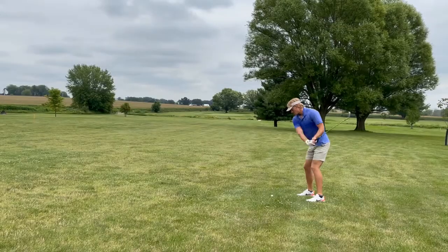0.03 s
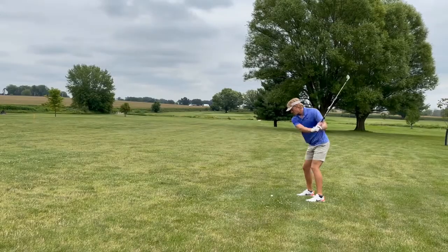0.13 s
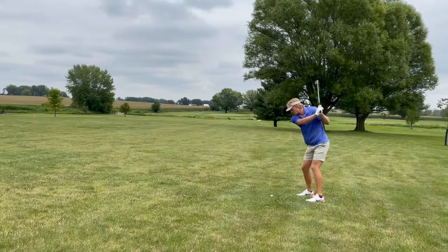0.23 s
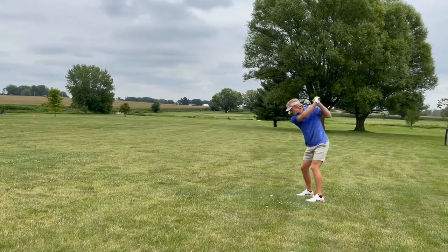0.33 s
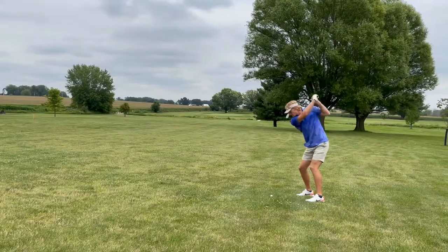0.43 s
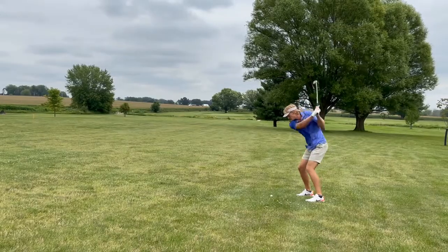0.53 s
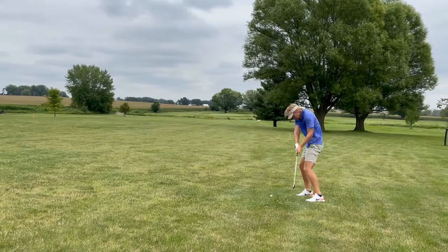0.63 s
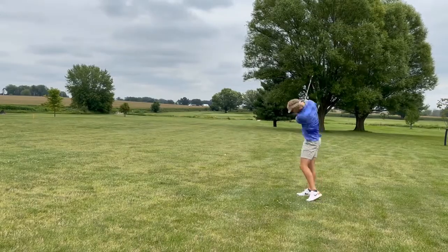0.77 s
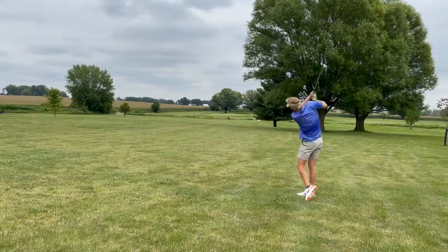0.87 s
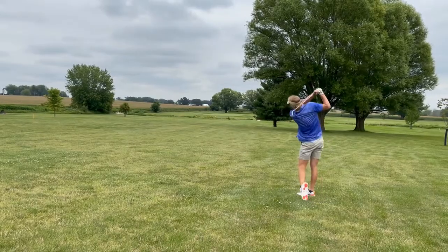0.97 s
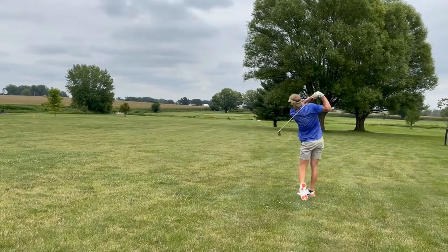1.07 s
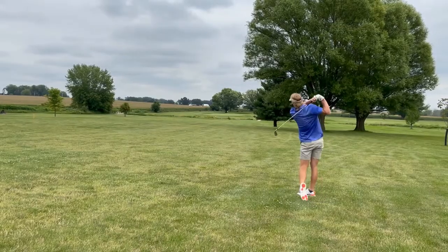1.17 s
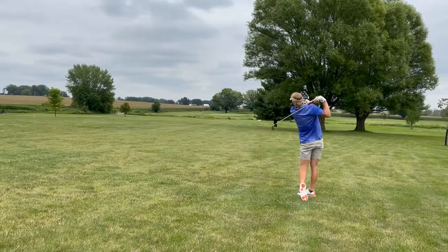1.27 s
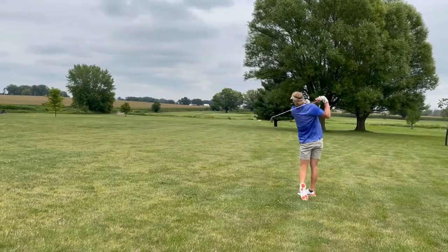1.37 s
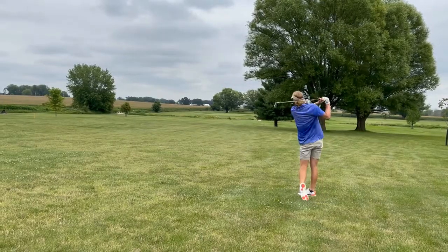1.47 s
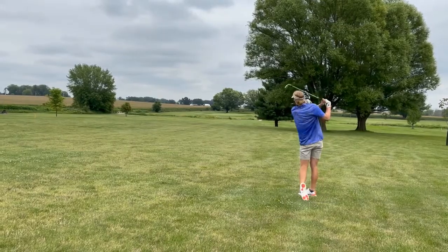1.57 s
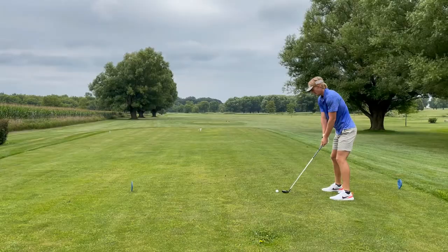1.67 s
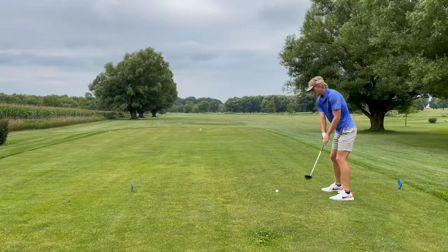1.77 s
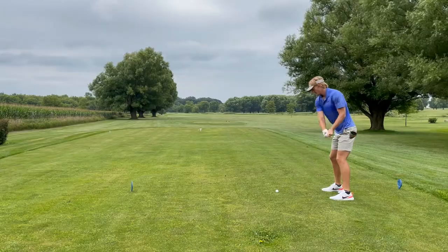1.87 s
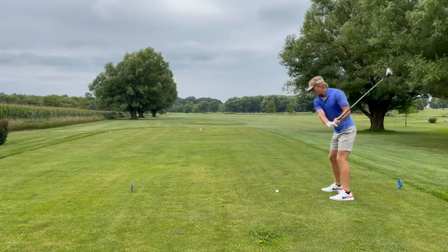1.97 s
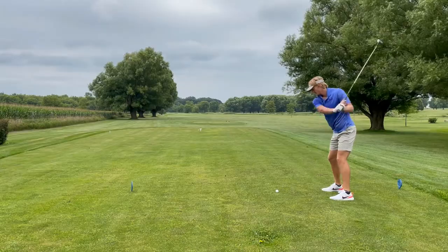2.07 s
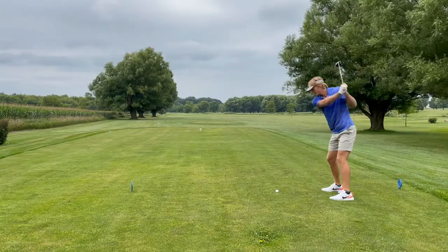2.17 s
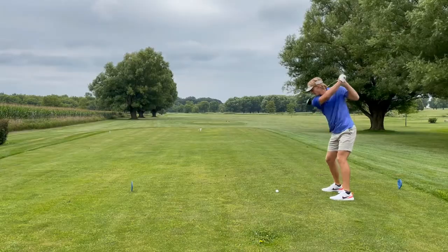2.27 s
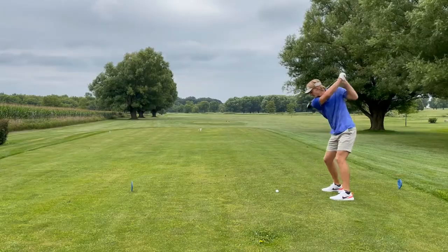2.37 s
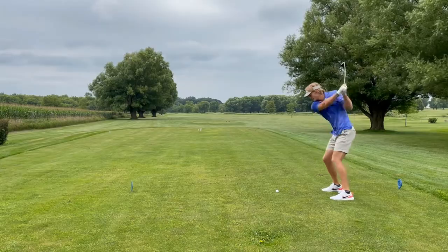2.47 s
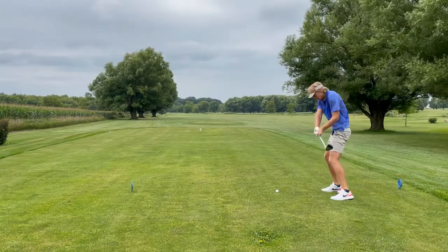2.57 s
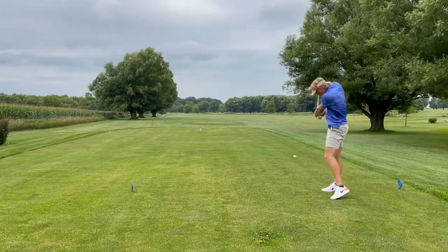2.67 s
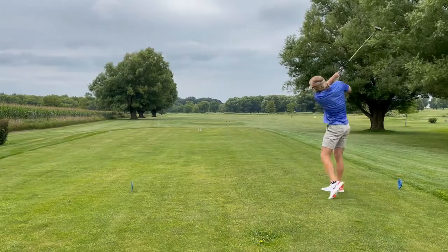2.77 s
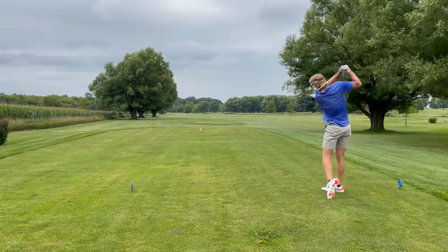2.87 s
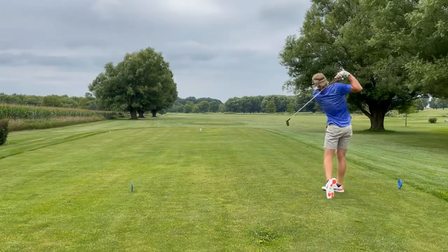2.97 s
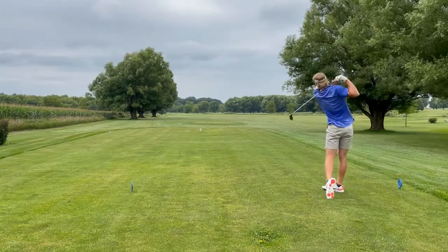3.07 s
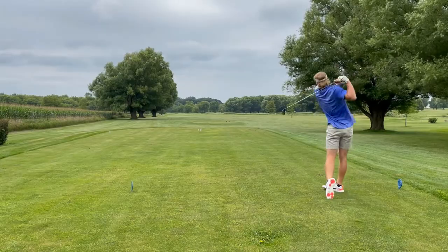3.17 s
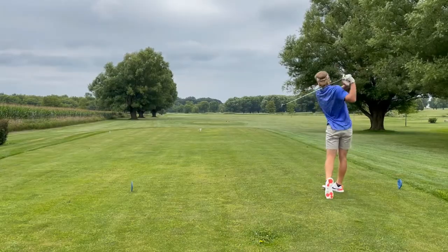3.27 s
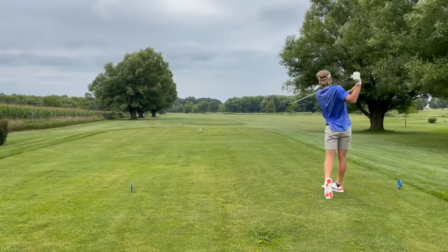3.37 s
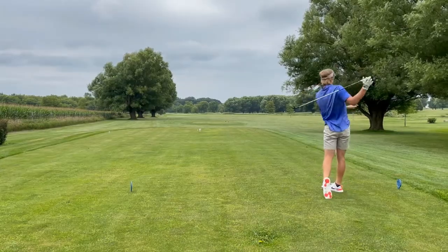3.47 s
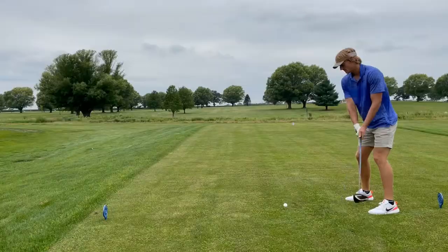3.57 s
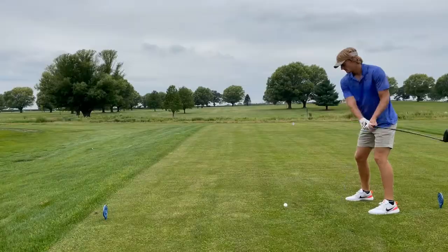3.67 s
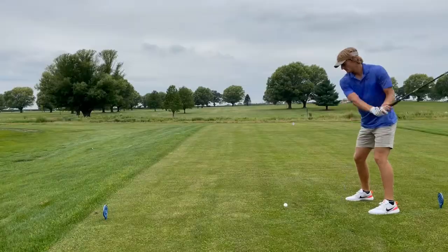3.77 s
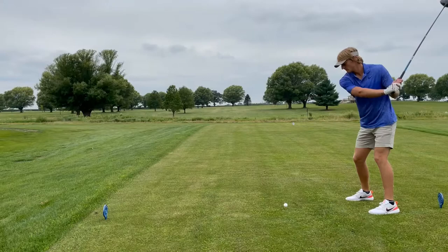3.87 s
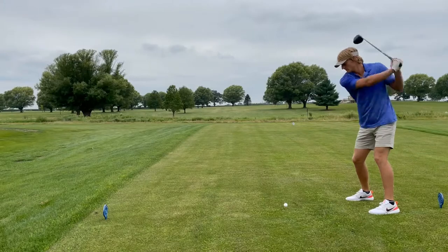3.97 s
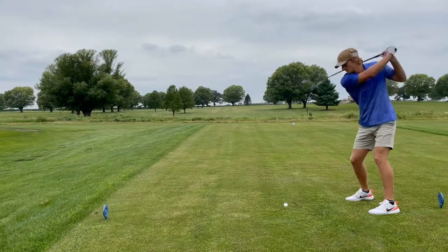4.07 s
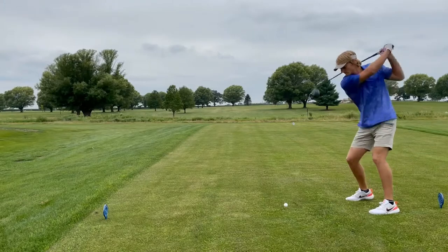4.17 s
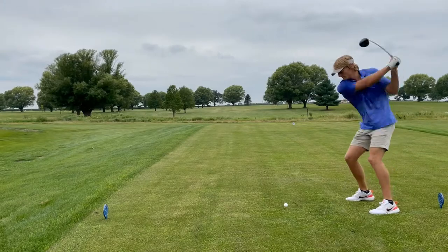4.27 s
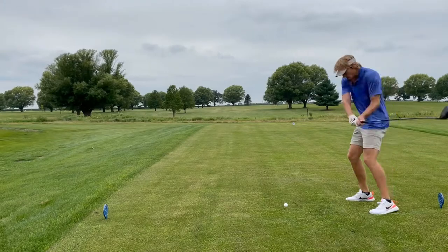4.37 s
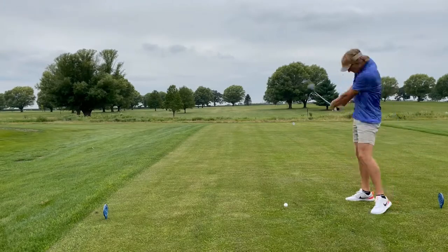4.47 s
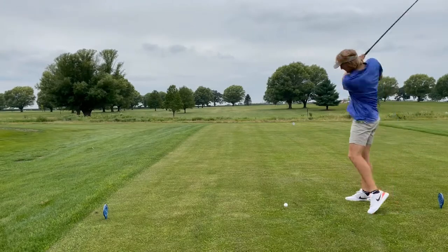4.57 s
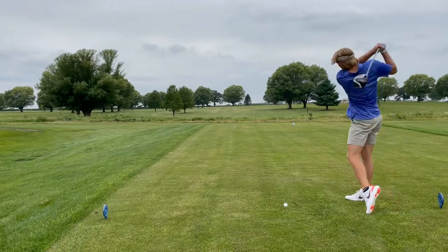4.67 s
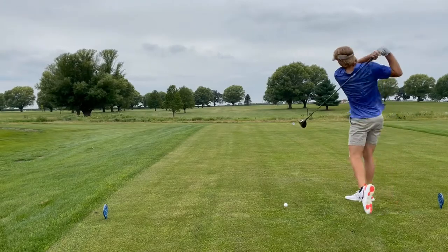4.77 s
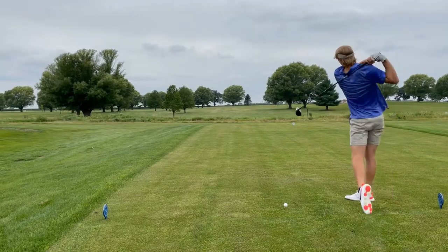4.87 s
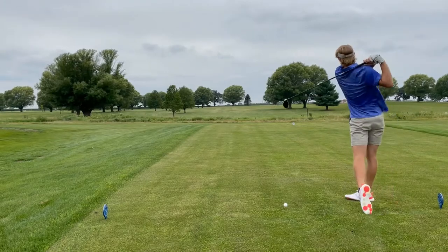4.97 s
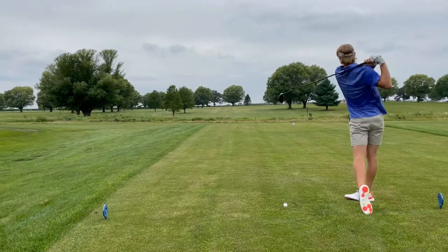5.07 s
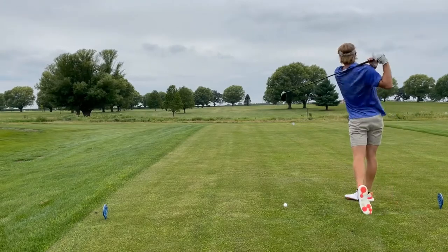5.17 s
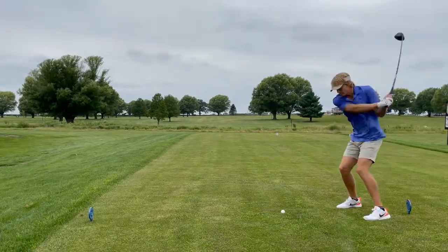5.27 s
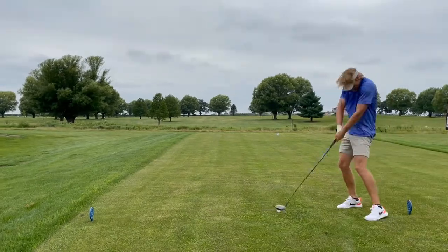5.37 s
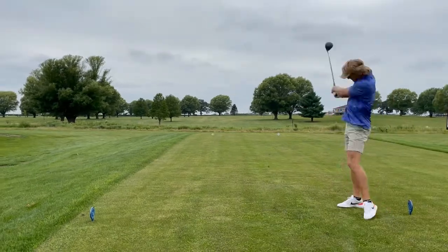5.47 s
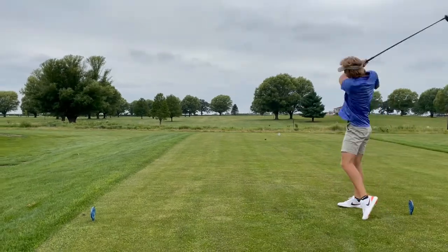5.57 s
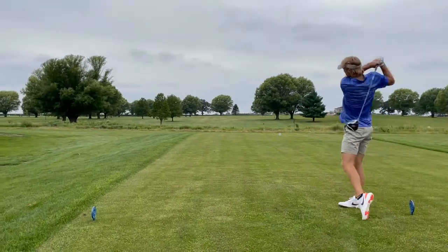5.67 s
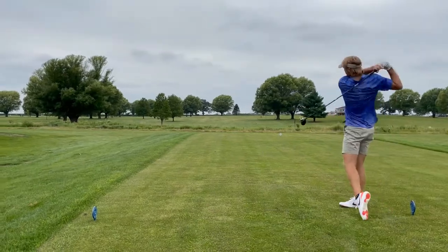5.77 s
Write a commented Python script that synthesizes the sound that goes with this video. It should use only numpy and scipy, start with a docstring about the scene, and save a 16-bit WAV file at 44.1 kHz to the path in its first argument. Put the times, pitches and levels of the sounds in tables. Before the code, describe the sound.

Whistling golf swings and hard, dry ball strikes follow one another outdoors over low rumble, far traffic and faint birdsong, with one practice swing between.

```python
"""Heard first: the low rumble and far traffic of an open golf course, with thin, distant bird tones above it.
Four scenes follow, an iron shot, a wood shot, a practice swing and a drive, each cut masked by a fade.
The shaft whistles by shedding eddies and the head hisses; band-shaped noise follows the club speed.
Each blow is a minimum-phase click, a brief ball tone, near echoes and the decaying modes of a hollow head.
Short noise puffs rustle, tick and swish; birds are gliding sines. A phone listens with two ports."""
import sys
import numpy as np
from scipy import signal
from scipy.fft import rfft, irfft, next_fast_len
from scipy.io import wavfile
from scipy.ndimage import uniform_filter1d, map_coordinates

SR = 44100
rng = np.random.default_rng(int(sys.argv[2]) if len(sys.argv) > 2 else 0)


def master_out(mix):
    """Clip the mix to full scale and print it as 16-bit PCM to the path in sys.argv[1]."""
    frames = np.transpose(np.atleast_2d(mix))
    ceiling = np.clip(frames, -1, 1)
    pcm = np.round(ceiling * 32767).astype(np.int16)
    wavfile.write(sys.argv[1], SR, pcm)


N = 256265
TIME = np.arange(N) / SR

# Scenes: start t/s, end t/s
SCENE_SPANS = [(0, 1.732), (1.732, 3.6), (3.6, 5.265), (5.265, 6)]
# Background spectrum, one list a scene: f/Hz, relative density level/dB
FIELD_SPECTRA = [
    [(25, -9), (50, -5.5), (90, 2.5), (160, -3), (300, -9), (500, -13.5), (900, -29), (1600, -34.5),
     (3000, -43), (5500, -45.5), (8500, -50), (12500, -49.5), (15500, -52.5)],
    [(25, -22), (50, 4), (90, -7.5), (160, -5), (300, -14), (500, -19.5), (900, -27.5), (1600, -31.5),
     (3000, -42), (5500, -48), (8500, -54), (12500, -47.5), (15500, -44)],
    [(25, -25), (50, 6.5), (90, 6), (160, -14.5), (300, -27.5), (500, -31.5), (900, -35.5), (1600, -40.5),
     (3000, -49.5), (5500, -56), (8500, -58), (12500, -55), (15500, -56)],
    [(25, -7.5), (50, 14), (90, 14.5), (160, -8.5), (300, -8.5), (500, -5), (900, -1.5), (1600, -11),
     (3000, -24.5), (5500, -22), (8500, -38.5), (12500, -33.5), (15500, -43.5)],
]
# Background course, one list a scene: t/s, rumble level/dB, traffic level/dB, leaf hiss level/dB
FIELD_LEVELS = [
    [(0, -53.5, -65.5, -84.5), (.6, -54, -54, -84.5), (.85, -55.5, -62.5, -77.5),
     (1.73, -53.5, -61.5, -81.5)],
    [(1.73, -56.5, -67.5, -79), (2.5, -59.5, -69.5, -75.5), (3.6, -57, -67.5, -75.5)],
    [(3.6, -56.5, -79.5, -84.5), (5.27, -58, -78.5, -80.5)],
    [(5.27, -61, -82, -81.5), (5.5, -61, -75.5, -72), (5.81, -59, -70.5, -71)],
]
# Left-right correlation of the field: f/Hz, correlation/1
FIELD_CORRELATION = [(60, .86), (300, .7), (700, .2), (3000, 0.2), (8000, 0.2), (15000, 1)]

# First bird: start t/s, length/s, initial f/Hz, level/dB reached at the end of the rise
BIRD_WHISTLES = [(0, 0.18, 4210, -61), (0.307, .2, 4143, -66.5), (0.608, .09, 4030, -65.5),
                 (0.996, 0.067, 4000, -75), (1.14, 0.06, 4070, -78), (1.278, 0.042, 4040, -81),
                 (1.41, 0.036, 4010, -69.5), (1.527, 0.045, 3990, -72.5)]
WHISTLE_RISE_S, SAG_HZ, SAG_S, FADE_DB_PER_S = 0.016, 170, .09, 105
# Thin far tone: start t/s, length/s, initial f/Hz, level/dB before it comes and goes
FAR_TONES = [(0, 1, 1643, -82.5), (1.003, .45, 1585, -91), (1.477, 0.293, 1555, -79.5)]
FAR_TONE_SAG_HZ_PER_S = 45
# Falling chips: t/s (8 ms after onset), initial level/dB
BIRD_CHIPS = [(.278, -80), (.58, -87), (1.125, -78), (1.26, -75), (1.389, -82)]
# Arching or sliding notes: start t/s, length/s, first f/Hz, middle f/Hz, last f/Hz, level/dB
BIRD_WARBLES = [ (1.83, .03, 2200, 2184, 2145, -80), (2.09, 0.052, 3550, 3470, 3450, -80.5),
                (2.245, .035, 3710, 4000, 4456, -86), (2.35, 0.05, 4580, 4740, 4900, -82),
                (2.415, 0.032, 4450, 4220, 4050, -78.5), (2.51, 0.036, 3400, 3990, 3300, -80.5),
                (2.849, .043, 4560, 4090, 3950, -71), (2.948, 0.042, 3150, 4036, 3220, -75),
                (3.061, .04, 2820, 3840, 4550, -77), (3.095, .03, 4550, 4150, 3600, -77),
                (3.118, 0.0347, 3650, 3840, 4424, -75), (4.101, 0.043, 2900, 3170, 3200, -78),
                (4.115, 0.061, 2416, 2270, 2335, -76.5), (4.18, 0.12, 2320, 2384, 2290, -89)]
# Trill pulse rate: t/s, rate/Hz
TRILL_RATE = [(4.54, 61), (4.8, 58.4), (5.04, 59.5)]
TRILL_SPAN_S = (4.54, 5.035)
LOW_VOICE_DB, HIGH_VOICE_DB = -73.5, -79  # low voice: level at the start
HIGH_LEAD_RAD = 2.4  # pulse phase by which the high voice comes first
SWELL_DB, LOW_VOICE_HZ, LIFT_HZ = 8, 2690, 58.4  # swell and lift: the low voice's gain by the end

# Swings, one a scene: lowest point t/s, shaft lead over head/s, whistle f/Hz at speed 1,
# levels/dB at speed 1 of whistle, hiss and wake, initial tone over rush/dB,
# level/dB lost after the lowest point by whistle, hiss and wake (negative: gained)
CLUB_SWINGS = [ (.712, 0.002, 760, -38.5, -48, -47.5, 7.1, 9.7, 8.5, 4),
               (2.642, 0.012, 902, -40, -43.5, -45, 6, 6, -4.5, 4.5),
               (4.428, -0.006, 993.6, -32, -43, -37, 12, 6.5, -1, 2),
               (5.4, 0.008, 1049, -29, -38, -34, 11, 30.4, 2.5, 6.5)]
# Club head speed: t/s from the lowest point, share of top speed/1
CLUB_SPEED = [(-.2, .12), (-.13, .3), (-.09, 0.43), (-.05, .88), (-.02, 0.98), (.03, .9), (.07, .72),
              (.12, .5), (.2, .33), (.4, .15)]
# Air and grass on the head: f/Hz, relative density level/dB
HISS_SPECTRUM = [(700, 4), (1500, -15.5), (2500, -16.5), (4000, -23), (6000, -22), (8500, -29.5),
                 (11000, -26.5), (13500, -24), (15500, -28.5)]
# Stirred air: f/Hz, relative density level/dB
WAKE_SPECTRUM = [(30, -16.5), (90, 3.5), (200, -4.5), (400, -8), (900, -44)]
# Left-right correlation of swing, spray and noise puffs: f/Hz, correlation/1
NEAR_CORRELATION = [(60, 0.99), (300, 0.97), (800, 0.6), (4000, 0.1), (8000, 0.8), (15000, 0.6)]
WHISTLE_POWER, HISS_POWER, WAKE_POWER = 4.1, 4.4, 3.1  # amplitude grows as speed to these powers
WAKE_LAG_S, SLOWING_S = 0.03, 0.018  # the wake arrives late; the losses become full in this time
BLUR_FROM_S, BLUR_S, BLUR_DB = -0.034, 0.053, 12  # the tone blurs into rush as the club turns away

# Short noise puffs, rustles, ticks and swishes around the blows: t/s (0.74 half-lengths after onset),
# level/dB before the swell, half-length/s, lower f/Hz, upper f/Hz
NOISE_PUFFS = [ (.711, -29, 0.0045, 800, 15370), (0.736, -54, 0.013, 9000, 16100),
               (0.794, -65.5, 0.016, 4460, 11900), (0.829, -73, 0.025, 986, 14900),
               (0.951, -60.5, 0.051, 1230, 6650), (0.959, -75.5, 0.082, 8966, 15340),
               (1.012, -65, 0.038, 988, 4900), (1.226, -55.5, 0.0048, 703, 5700),
               (1.228, -60, .035, 2500, 15600), (1.511, -68, 0.042, 2500, 15600),
               (1.665, -55, 0.0049, 1494, 15000), (1.68, -64.5, 0.032, 500, 2000),
               (1.851, -74.5, .12, 2030, 3970), (2.777, -56, .018, 787, 6500),
               (2.8, -59.5, 0.029, 1177, 3000), (2.82, -66, .11, 1500, 15000),
               (3.149, -57.5, 0.0098, 710, 2954), (3.165, -57, 0.01, 693, 2795),
               (3.89, -62.5, 0.0046, 888, 11920), (4.051, -76, 0.033, 1496, 2940),
               (4.451, -33.5, .012, 154.3, 703), (4.826, -69, 0.0037, 5050, 14740),
               (4.931, -74.5, 0.039, 297.8, 955), (5.55, -63, 0.011, 4516, 7500),
               (5.691, -59, 0.055, 5000, 6600), (5.687, -69.5, 0.039, 808, 1500),
               (5.737, -64.5, .006, 1010, 9080), (5.776, -65.5, 0.059, 4600, 7370)]
# Spectrum of the puffs: f/Hz, relative density level/dB
PUFF_SPECTRUM = [(500, 3.5), (3000, 0.5), (6000, -5), (8500, -10.5), (13500, -2), (16000, -2.5)]

# Blows: t/s, click level/dB, ball level/dB, ball f/Hz, spray level/dB, spray 60 dB decay/s, ring level/dB
CLUB_STRIKES = [(.714, -0.5, -6.5, 1750, -12.5, .025, -19), (2.645, -4.5, -6, 1650, -15.5, .03, -22),
                (5.4026, -4.5, -3, 1400, -12.5, .04, -17.5)]
# Click spectrum, one list a blow: f/Hz, relative level/dB
FACE_SPECTRA = [
    [(60, -12.5), (130, -10), (250, -9), (500, 3.5), (1000, -1), (1700, -10.5), (2600, 2), (3600, -5),
     (5000, -6), (7000, -2), (9000, -13), (12000, -8), (15500, -12.5)],
    [(60, -18), (130, -9), (250, -1.5), (500, -11.5), (1000, -8), (1700, -13), (2600, -1), (3600, -7.5),
     (5000, -5.5), (7000, -16), (9000, -19), (12000, -28.5), (15500, -26)],
    [(60, -11), (130, -2), (250, -2.5), (500, -1), (1000, -4), (1700, -9), (2600, -13.5), (3600, -12.5),
     (5000, -11), (7000, -7.5), (9000, -13.5), (12000, -12.5), (15500, -23.5)],
]
# Head modes, one list a blow: f/Hz before Doppler shift, relative level/dB, 60 dB decay/s
HEAD_MODES = [
    [(90.96, -17, 0.29), (245, -12, 0.096), (715, -1, .02), (1199, 0.5, 0.025), (2570, 3, 0.02),
     (4450, -0.5, 0.015)],
    [(94, -11, 0.14), (247, 2.5, 0.047), (1110, 3, 0.017), (2090, -0.5, 0.023), (3700, 1, 0.014),
     (5130, -3.5, .03), (2390, 2, 0.012), (5080, 0, .03)],
    [(129, -5.5, 0.084), (289, -2.5, 0.031), (1105.5, 2.5, 0.021), (1910, -33, 0.49), (2873, -9, 0.18),
     (2950, -12, 0.2), (3640, -39.5, 0.98), (3837, -6.5, 0.11), (4890, -4, 0.13), (4540, -15.5, .1),
     (5044, -14, 0.13), (5264, -4.5, 0.1), (5820, -5.5, 0.14), (5700, -9.5, 0.0315), (6600, -10.5, 0.055),
     (6470, -1.5, 0.078), (7120, -18.5, 0.057)],
]
# Doppler shift as the head swings round: t/s after the blow, frequency factor/1
DOPPLER = [(0, 1), (.1, 1.08), (.15, 1.11), (.3, 1.045), (.5, 1.04)]
# Near echoes: nominal delay t/s, level/dB
NEAR_ECHOES = [(.0016, -12), (.0028, -9), (.0042, -14), (.0063, -18), (.009, -24)]

# Phase of the left port over the right, birds excepted: f/Hz, phase/rad
PORT_PHASE = [(20, 0), (1400, -.3), (4800, .4), (6000, -1.9), (8700, -3.14), (11200, -5.3), (13500, -6.2),
              (16000, -6.9)]
TOP_HZ = 15950
LAG_CYCLES = .65  # the phone's filters delay each frequency above 30 Hz by this many of its own cycles


def amp(db):
    """Level definition: decibels to amplitude gain."""
    return 10 ** (np.asarray(db) / 20)


def unit(x):
    """Normalisation: a signal scaled to rms 1."""
    return x / np.sqrt(np.mean(x ** 2) + 1e-20)


def along(points, hz):
    """Interpolation on a logarithmic frequency axis."""
    f, v = np.transpose(points)
    return np.interp(np.log(hz + 1), np.log(f + 1), v)


def curves(rows, t=TIME):
    """Linear interpolation in time of each column after the first."""
    s, *cols = np.transpose(rows)
    return [np.interp(t, s, c) for c in cols]


def filtered(x, response):
    """Linear filtering: the spectrum times a complex frequency response."""
    m = next_fast_len(x.shape[-1] + 8192)
    spectrum = rfft(x, m) * response(np.fft.rfftfreq(m, 1 / SR))
    return irfft(spectrum, m)[..., :x.shape[-1]]


def band(hz, low_hz, high_hz, order):
    """Butterworth principle: gain of a smooth band-pass."""
    high_pass = 1 + (low_hz / (hz + 1)) ** (2 * order)
    low_pass = 1 + (hz / high_hz) ** (2 * order)
    return 1 / np.sqrt(high_pass * low_pass)


def wobble(rate, size):
    """Band-limited fluctuation: a spline through random knots, rate of them a second."""
    knots = rng.standard_normal(int(size * rate / SR) + 4)
    return map_coordinates(knots, [np.arange(size) * rate / SR])


def pair(gain, alike, size):
    """Partial coherence: mid and side noise, weighted for the wanted correlation, at rms 1."""
    def weights(hz):
        angle = np.arccos(np.clip(along(alike, hz), -1, 1)) / 2
        return gain(hz) * [np.cos(angle), np.sin(angle)]
    mid, side = filtered(rng.standard_normal((2, size)), weights)
    return unit(np.array([mid + side, mid - side]))


def add(track, sound, s):
    """Superposition: mixes a sound in from time s."""
    part = track[..., max(round(s * SR), 0):][..., :sound.shape[-1]]
    part += sound[..., :part.shape[-1]]


def field():
    """Incoherent superposition: rumble, traffic and leaves are three fluctuating noise bands."""
    out = np.zeros((2, N))
    for (start, end), colour, rows in zip(SCENE_SPANS, FIELD_SPECTRA, FIELD_LEVELS):
        t = TIME[round(start * SR):round(end * SR)]
        size = len(t)
        rumble_db, traffic_db, leaf_db = curves(rows, t)

        def layer(low, high):
            return pair(lambda hz: amp(along(colour, hz)) * band(hz, low, high, order=3),
                        FIELD_CORRELATION, size)

        bed = amp(rumble_db + 2.3 * wobble(5.4, size)) * layer(33, 200)
        bed += amp(traffic_db + 0.95 * wobble(1.2, size)) * layer(270, 1200)
        bed += amp(leaf_db + 0.51 * wobble(6.1, size)) * layer(2200, 23000)
        add(out, bed, start)
    return out


def note(length, hz, db, edge):
    """Frequency modulation: a slightly unsteady sine; hz and db are functions of time since its start."""
    t = np.arange(0, length, 1 / SR)
    fade = np.clip(np.minimum(t, length - t) / edge, 0, 1)
    unsteady_hz = hz(t) * (1 + 0.0014 * wobble(53, len(t)))
    tone = np.sin(2 * np.pi * np.cumsum(unsteady_hz) / SR)
    return np.sqrt(2) * amp(db(t) + 1.3 * wobble(50, len(t))) * fade * tone


def bird_whistle(length, hz, db):
    """Exponential relaxation: the pitch sags towards a lower one as the level falls steadily."""
    return note(length, lambda t: hz - SAG_HZ * (1 - np.exp(-t / SAG_S)),
                lambda t: db - FADE_DB_PER_S * (t - WHISTLE_RISE_S), WHISTLE_RISE_S)


def far_tone(length, hz, db):
    """Slow amplitude modulation: a sagging tone comes and goes on the wind."""
    tone = note(length, lambda t: hz - FAR_TONE_SAG_HZ_PER_S * t, lambda t: db, edge=0.06)
    return tone * (.5 + 0.2 * wobble(21, len(tone)))


def chip(db):
    """Power-law glide: a very short tone falls ever faster in pitch."""
    return note(0.011, lambda t: 5250 - 850 * (t / .016) ** 1.6,
                lambda t: db - 10 * (t / .016) ** 4, edge=.003)


def warble(length, first_hz, middle_hz, last_hz, db):
    """Parabolic glide: the pitch passes through three given values."""
    arch = np.poly1d(np.polyfit([0, length / 2, length], [first_hz, middle_hz, last_hz], deg=2))
    return note(length, arch, lambda t: db, edge=0.0088)


def trill():
    """Pulse modulation: a high chirp and a swelling low note alternate, with a faint rasp between in pitch."""
    t = np.arange(*TRILL_SPAN_S, 1 / SR)
    size = len(t)
    done = np.linspace(0, 1, size)
    rate, = curves(TRILL_RATE, t)
    beat = 2 * np.pi * (np.cumsum(rate) / SR + 0.49)
    high_beat = beat + HIGH_LEAD_RAD
    low_phase = 2 * np.pi * np.cumsum(LOW_VOICE_HZ + LIFT_HZ * done ** 2) / SR
    low_phase = low_phase + 0.28 * np.sin(beat) + 0.9 * wobble(71.7, size)
    low = unit(np.exp(1.8 * np.cos(beat)) * np.sin(low_phase) * amp(1.2 * wobble(41.4, size)))
    chirp_hz = 4860 + 70 * np.sin(high_beat) + 170 * wobble(1500, size)
    chirp = np.sin(2 * np.pi * np.cumsum(chirp_hz) / SR)
    rasp = unit(filtered(rng.standard_normal(size), lambda f: band(f, 3150, 3450, order=30)))
    high = unit(chirp * np.exp(1.1 * np.cos(high_beat))) * np.sin(np.pi * done) ** 0.18
    edge = np.clip((1 - done) / .03, 0, 1)
    low_level = edge * amp(LOW_VOICE_DB + SWELL_DB * done)
    return low_level * (low + amp(-19.5) * rasp) + amp(HIGH_VOICE_DB) * high


def birds():
    """Multiple scattering: far song is convolved with the decaying noise of the trees."""
    out = np.zeros(N)
    for s, *shape in BIRD_WHISTLES:
        add(out, bird_whistle(*shape), s)
    for s, *shape in FAR_TONES:
        add(out, far_tone(*shape), s)
    for s, db in BIRD_CHIPS:
        add(out, chip(db), s - .008)
    for s, *shape in BIRD_WARBLES:
        add(out, warble(*shape), s)
    add(out, trill(), TRILL_SPAN_S[0])
    t = np.arange(SR // 5) / SR
    trees = rng.standard_normal((2, len(t))) * amp(-60 * t / 0.22)
    trees = trees / np.linalg.norm(trees[0])
    return out + amp(-7.0) * signal.fftconvolve(out[None], trees, axes=1)[:, :N]


def swing():
    """Vortex shedding: eddy pitch is proportional to shaft speed; flow noise grows as a power of speed."""
    rows = np.array(CLUB_SWINGS)[np.searchsorted([start for start, end in SCENE_SPANS[1:]], TIME)]
    (s, ahead_s, top_hz, whistle_db, hiss_db, wake_db, tone_db,
     whistle_lost_db, hiss_lost_db, wake_lost_db) = rows.T

    def speed_at(t):
        return np.clip(uniform_filter1d(curves(CLUB_SPEED, t)[0], size=600), .01, 2)

    since = TIME - s
    head, shaft, stirred = speed_at(since), speed_at(since + ahead_s), speed_at(since - WAKE_LAG_S)
    slowed = np.clip(since / SLOWING_S, 0, 1)
    tone_db = tone_db - BLUR_DB * np.clip((since - BLUR_FROM_S) / BLUR_S, 0, 1)
    phase = 2 * np.pi * np.cumsum(top_hz * shaft) / SR

    def eddies(k, rate):
        """Narrow-band noise about k times the shedding frequency."""
        return unit(wobble(rate, N) * np.cos(k * phase) + wobble(rate, N) * np.sin(k * phase))

    tone = unit(eddies(1, 210) + amp(-8) * eddies(.58, 200) + amp(-14) * eddies(1.8, 500))
    tone = tone + 0.44 * np.array([[1], [-1]]) * eddies(0.9921, 330)  # opposite in the two ports
    rush = pair(lambda f: band(f, 320, 1300, order=2), NEAR_CORRELATION, N)
    whistle = (amp(tone_db) * tone + rush) / np.sqrt(amp(2 * tone_db) + 1)
    grain = amp(1.5 * wobble(150, N))
    hiss = grain * pair(lambda f: amp(along(HISS_SPECTRUM, f)) * band(f, 1300, 20000, order=3),
                        NEAR_CORRELATION, N)
    wake = pair(lambda f: amp(along(WAKE_SPECTRUM, f)), NEAR_CORRELATION, N)
    return (amp(whistle_db - whistle_lost_db * slowed) * shaft ** WHISTLE_POWER * whistle
            + amp(hiss_db - hiss_lost_db * slowed) * head ** HISS_POWER * hiss
            + amp(wake_db - wake_lost_db * slowed) * stirred ** WAKE_POWER * wake)


def noise_puffs():
    """Band-limited noise: grainy puffs under a rounded swell that rises faster than it falls."""
    out = np.zeros((2, N))
    for s, db, length, low_hz, high_hz in NOISE_PUFFS:
        size = round(2 * length * SR)
        puff = pair(lambda hz: band(hz, low_hz, high_hz, order=4) * amp(along(PUFF_SPECTRUM, hz)),
                    NEAR_CORRELATION, size)
        swell = np.sin(np.pi * np.linspace(0, 1, size) ** 0.48) ** 2
        add(out, amp(db + 0.73 * wobble(230, size)) * puff * swell, s - .74 * length)
    return out


def causal(colour, size=2048):
    """Minimum phase: a folded cepstrum gives the most compact causal pulse with this spectrum."""
    points = [(5.1, -55.5)] + list(colour)  # closes the bass end
    cepstrum = irfft(np.log(amp(along(points, np.fft.rfftfreq(size, 1 / SR)))))
    cepstrum[1:size // 2] *= 2
    cepstrum[size // 2 + 1:] = 0
    pulse = irfft(np.exp(rfft(cepstrum)))
    return pulse / np.abs(pulse).max()


def near_echoes(size):
    """Reflection: the direct impulse and delayed copies of random sign, delays varied by up to 15 %."""
    kicks = np.zeros(size)
    kicks[0] = 1
    for delay, db in NEAR_ECHOES:
        kicks[round(delay * SR * rng.uniform(.85, 1.15))] = amp(db) * rng.choice([-1, 1])
    return kicks


def head_ring(modes, t):
    """Modal decay with Doppler shift: each damped mode flutters randomly, which makes a rough ringing."""
    glide = np.cumsum(curves(DOPPLER, t)[0]) / SR
    ring = np.zeros(len(t))
    for hz, db, t60 in modes:
        flutter = .8 + .55 * (wobble(240, len(t)) + 1j * wobble(240, len(t)))
        mode = np.exp(2j * np.pi * (hz * glide + rng.random()))
        ring += amp(db - 60 * t / t60) * np.imag(flutter * mode)
    return ring * (1 - np.exp(-t / 0.00047))


def strikes():
    """Impact excitation: click and ball, near echoes, a spray of turf and tee, and the ringing head."""
    out, t = np.zeros((2, N)), np.arange(SR // 2) / SR
    for row, colour, modes in zip(CLUB_STRIKES, FACE_SPECTRA, HEAD_MODES):
        s, click_db, ball_db, ball_hz, spray_db, spray_t60, ring_db = row
        kicks = near_echoes(len(t))
        # The ball flattens and springs back
        ball = np.sin(2 * np.pi * ball_hz * t) * amp(-60 * t / .004) * (1 - np.exp(-t / .0003))
        pulse = amp(click_db) * causal(colour) + amp(ball_db) * ball[:2048] / ball.max()
        blow = signal.fftconvolve(kicks, pulse)[:len(t)]
        spray_decay = amp(-60 * t / spray_t60) + amp(-32.0 - 60 * t / 0.26)  # fast, then a faint slow tail
        spray = pair(lambda hz: amp(along(colour, hz)), NEAR_CORRELATION, len(t)) * spray_decay
        add(out, blow + amp(spray_db) * spray + amp(ring_db) * head_ring(modes, t), s)
    return out


def edits():
    """Amplitude gating: the sound fades out and in again at every cut between scenes."""
    nearest = np.min([np.abs(TIME - start) for start, end in SCENE_SPANS[1:]], axis=0)
    return np.clip((nearest - .004) / 0.039, 0, 1)


def scene():
    """Interchannel phase: all but the birds reach the two ports out of step in the treble."""
    club = swing() + noise_puffs() + strikes()
    air = club * amp([[.4], [-.4]]) + field()  # the club is 0.8 dB stronger on the left
    ports = filtered(air, lambda hz: np.exp(.5j * along(PORT_PHASE, hz) * [[1], [-1]]))
    return ports + birds()


def record(dry):
    """Dispersion: bass trails treble; the scenes are joined and cut off above the band limit."""
    late = filtered(dry, lambda hz: np.exp(-2j * np.pi * LAG_CYCLES * np.log(np.maximum(hz, 30) / TOP_HZ)))
    return filtered(late * edits(), lambda hz: hz < TOP_HZ)


dry = scene()
out = record(dry)
master_out(out)
```